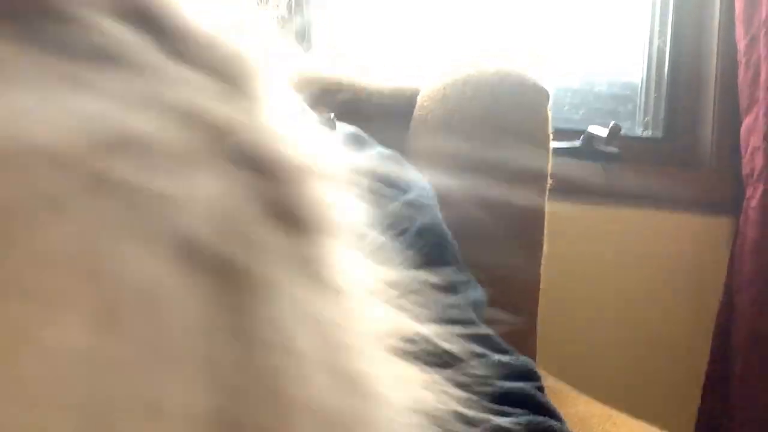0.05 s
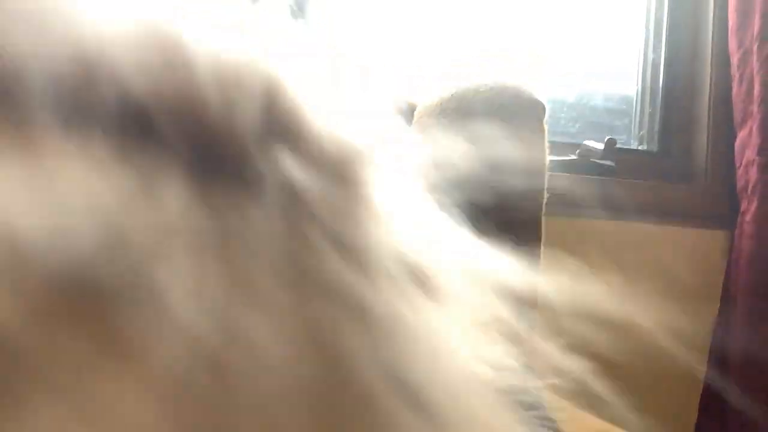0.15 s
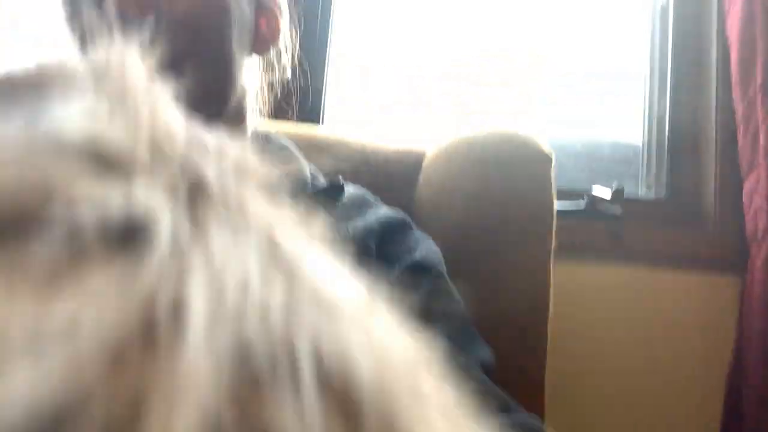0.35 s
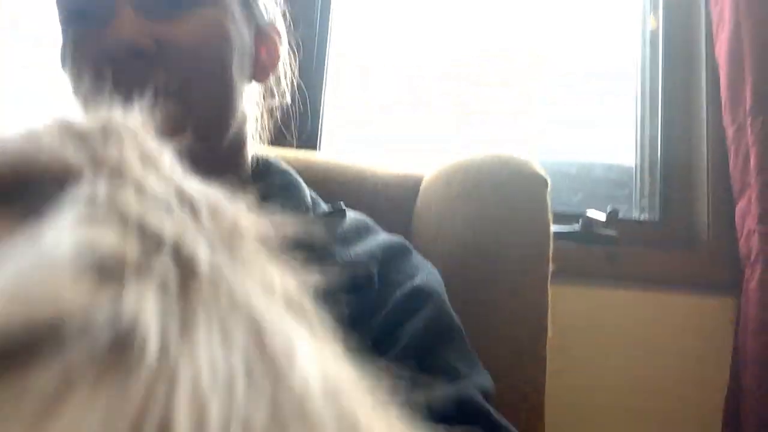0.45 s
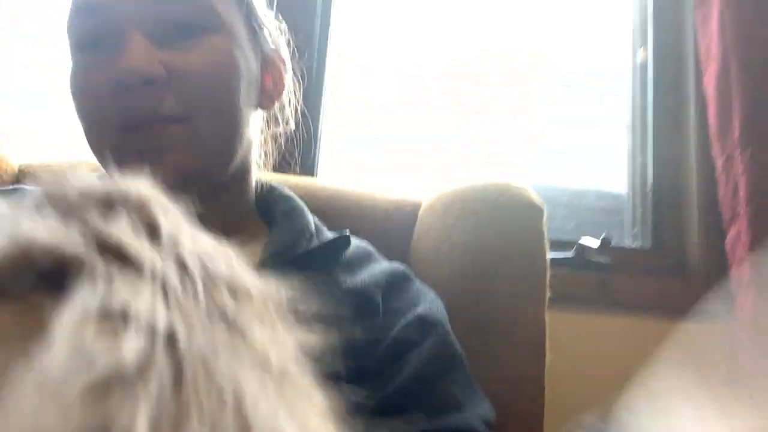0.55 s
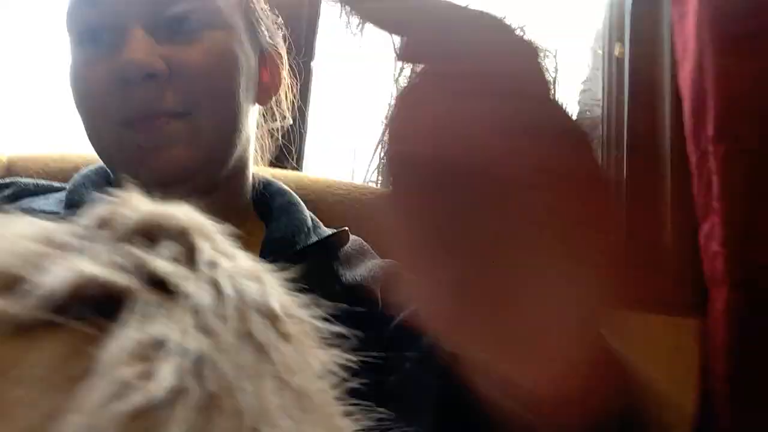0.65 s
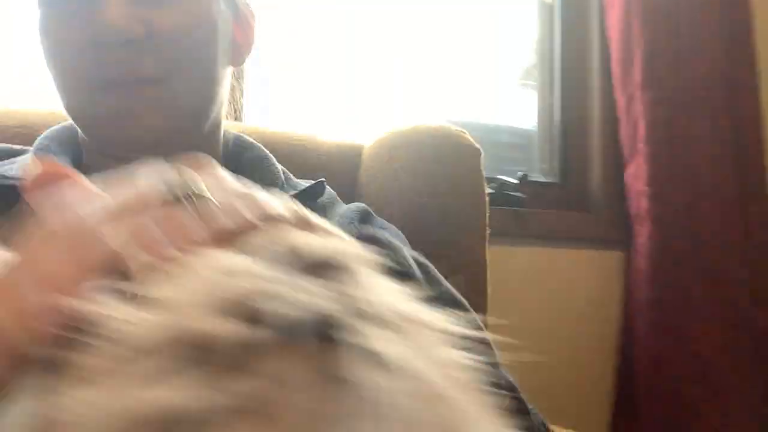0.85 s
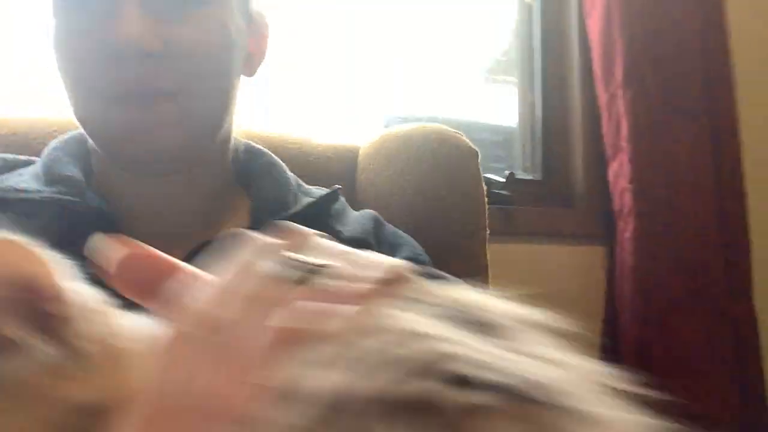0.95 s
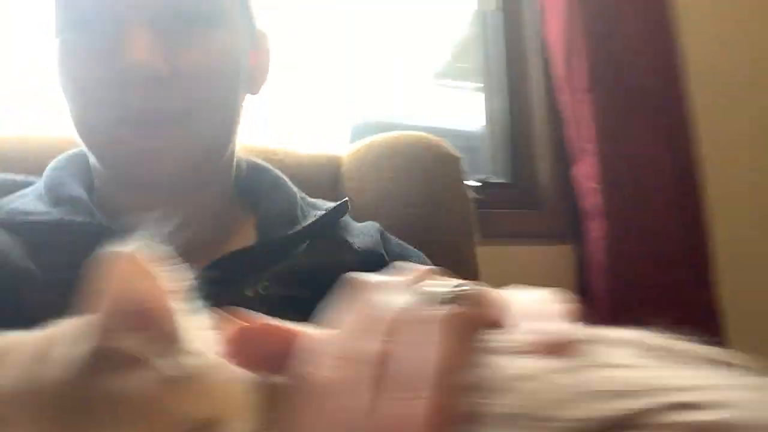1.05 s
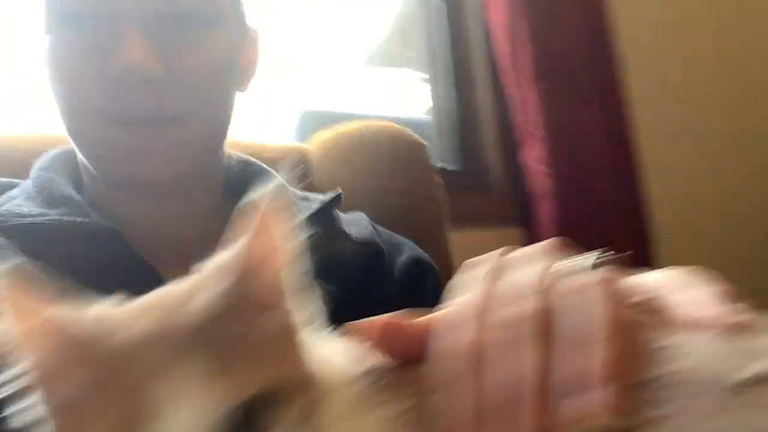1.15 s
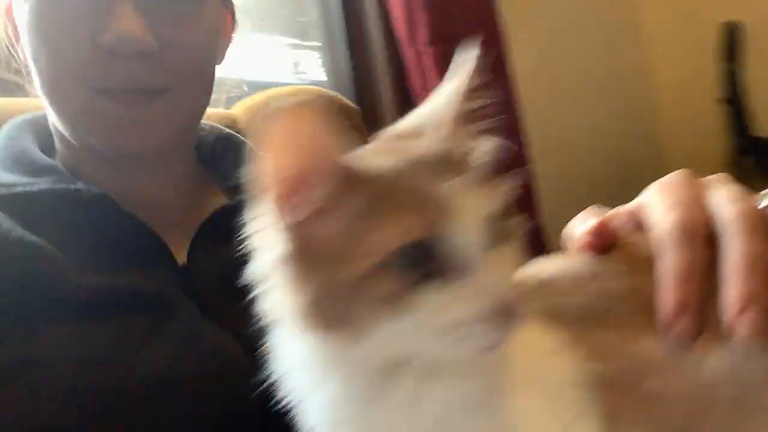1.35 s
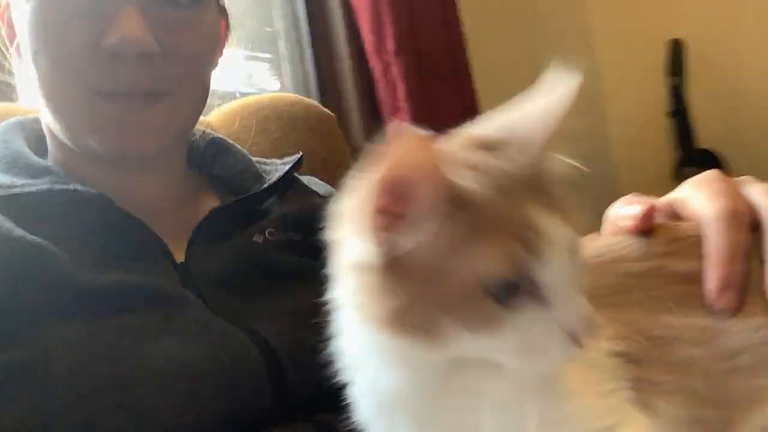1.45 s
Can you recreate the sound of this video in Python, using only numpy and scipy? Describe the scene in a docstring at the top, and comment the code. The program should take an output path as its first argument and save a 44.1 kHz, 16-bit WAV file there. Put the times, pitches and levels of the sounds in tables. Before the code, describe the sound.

A kitten purrs softly up close while its fur rustles against the microphone.

```python
"""A quiet room: a kitten purrs softly right at the microphone while a hand strokes it.
Its larynx opens and closes about 25 times a second; each pulse pops in the throat and rings the chest.
Fur slides over the microphone with a hiss and a coarser, resonant rub, and the casing takes
one small knock with a low thud, then a fainter tick. The purr goes on with a few light pats.
A faint thin whistle sits above it throughout."""
import sys
import numpy as np
from scipy import signal
from scipy.fft import rfft, irfft
from scipy.io import wavfile

SR = 44100
rng = np.random.default_rng(int(sys.argv[2]) if len(sys.argv) > 2 else 0)


def wrap_up_sound(samples):
    """Save the sound to the file named by the first command line argument, as 16-bit audio."""
    columns = np.atleast_2d(samples).T
    # keep every value between -1 and 1, then stretch to whole-number steps
    tamed = np.clip(columns, -1, 1)
    steps = np.round(tamed * 32767).astype(np.int16)
    wavfile.write(sys.argv[1], SR, steps)


N = 66150
T = np.arange(N) / SR

# Purr effort: time_s, pop_db, chest_db, opening_lead_s, opening_vs_closing_db
PURR_EFFORT = [(0, -64, -46, 0.011, -6.5), (.18, -52.5, -50, 0.011, -3.5), (.35, -80, -48, 0.015, -7.5),
               (.65, -47.5, -48, 0.0128, -4.5), (.82, -62, -56.5, 0.0099, -4), (.93, -56, -51, 0.011, -3.5),
               (1.06, -53, -49.5, 0.011, -4.5), (1.128, -53, -49.5, 0.01036, -5),
               (1.165, -68, -49.5, 0.011, 3), (1.2, -52, -53.5, 0.0127, -4), (1.25, -48, -47, 0.013, -1.5),
               (1.29, -53.5, -50.5, 0.011, 1), (1.36, -56, -51, 0.013, 4), (1.5, -57, -53.5, 0.012, 0)]
# Larynx cycles: time_s, rate_hz
PURR_RATE = [(0, 25.3), (.18, 25.95), (.3, 24.3), (.6, 24.97), (.82, 25.5), (1.02, 25.95), (1.15, 26.1),
             (1.18, 24), (1.25, 24.15), (1.32, 24.7), (1.4, 24.5), (1.5, 25.5)]
# Hairs sliding over the microphone: time_s, level_db
HISS_LEVEL = [(0, -67), (.06, -64.5), (.13, -60.5), (.197, -68), (.212, -48.5), (.245, -50.5), (.268, -60),
              (.295, -67), (.316, -48), (.365, -53), (.44, -50), (.46, -56), (.51, -50.5), (.56, -49.5),
              (.635, -50), (.7, -54), (.755, -55), (.79, -66.5), (.84, -78.5), (.9, -78.5)]
# Hiss colour: freq_hz, density_db
HISS_SPECTRUM = [(300, -5), (900, -3), (1300, -16), (1900, -7), (2450, -6), (3100, -5), (4500, -4.5),
                 (5600, -2.5), (6700, 3.5), (7500, -1), (8500, -7.5), (10500, -20.5), (13000, -33),
                 (16000, -37.5)]
# Coat dragging on the casing: time_s, level_db
RUB_LEVEL = [(0, -69.5), (.195, -71.5), (.212, -46), (.235, -42.5), (.26, -45), (.28, -50.5), (.305, -51),
             (.325, -44.5), (.345, -44.5), (.372, -39.5), (.382, -43.5), (.428, -50.5), (.443, -46),
             (.462, -51.5), (.482, -53), (.505, -52.5), (.55, -61), (.63, -64.5), (.68, -60), (.755, -57.5),
             (.79, -66), (.85, -100)]
# Rub colour: freq_hz, density_db
RUB_SPECTRUM = [(40, -32), (80, -4.5), (200, -1), (400, -6), (650, -3.5), (950, -5), (1300, -5),
                (1850, -14), (2450, -11.5), (3300, -19), (6000, -25), (11000, -34.5), (15000, -62.5)]
# Hair tips flicking the port: centre_s, width_s, level_db
FLICKS = [(.41, 0.022, -61), (.68, 0.043, -70.5)]
# Flick colour: freq_hz, density_db
FLICK_SPECTRUM = [(5000, -30), (9000, 5), (11500, 5), (13500, -8), (15000, -8), (16000, -14)]
# Hand passing lightly over the back: centre_s, width_s, level_db
PATS = [(1.005, 0.01, -65.5), (1.03, .012, -77), (1.118, 0.014, -77)]
# Pat colour: freq_hz, density_db
PAT_SPECTRUM = [(300, -9), (700, 6.5), (1250, -5.5), (2000, -14), (2700, -16), (4000, -23), (9000, -33)]
# Thin whistle: time_s, pitch_hz, level_db
WHISTLE = [(0, 7540, -72.5), (.81, 7720, -77), (.9, 7550, -79), (.96, 7400, -79), (1.02, 7610, -74.5),
           (1.07, 7500, -86), (1.12, 7440, -78), (1.3, 7390, -76), (1.5, 7350, -76)]
# Room hush: freq_hz, density_db
ROOM_SPECTRUM = [(25, -46), (42, -22.5), (65, 5), (110, 0), (200, -2), (400, -11.5), (700, -21),
                 (1000, -26.5), (3000, -36), (6200, -44), (6900, -36.5), (7500, -26.5), (8600, -32.5),
                 (15500, -36.5)]
# Rub resonances, the knock's low thud, soft bumps: start_s, level_db, pitch_hz, t60_s
LOW_RINGS = [(.226, -42.5, 135, 0.029), (.224, -43.5, 561, 0.051), (.238, -29.5, 485, 0.029),
             (.255, -41, 289, 0.17), (.2905, -37.5, 326, 0.059), (0.293, -25.5, 106, 0.035),
             (0.3132, -24.5, 145.5, 0.044), (0.317, -31, 66.6, 0.14), (0.369, -40.5, 207, 0.03),
             (.441, -27.5, 653, 0.019), (.437, -38, 137, 0.032), (.45, -35.5, 214, 0.042),
             (0.696, -52.5, 79, 0.19)]
# Ticks on the casing: start_s, level_db
KNOCKS = [(0.3097, -2), (0.3706, -14)]
# Casing modes: pitch_hz, gain_db, t60_s
CASING_MODES = [(7220, -12.5, 0.0024), (5500, -20.5, 0.0023), (3440, -19, 0.0039), (2460, -20.5, 0.0098),
                (1800, -29.5, 0.013), (1270, -20, .012)]

POP_HZ, POP_WIDTH_S, POP_SAG_HZ_PER_S = 568, .0011, 14000
CHEST_HZ, CHEST_RISE_S, CHEST_DECAY_S, CHEST_LEAD_S = 208.8, .0025, .0055, .00097
HISS_GRAINS_PER_S, RUB_GRAINS_PER_S = 14000, 3500


def from_db(db):
    """Decibels to gain."""
    return 10 ** (np.asarray(db) / 20)


def unit_rms(x):
    """Scale to rms 1."""
    return x / np.sqrt(np.mean(x ** 2) + 1e-20)


def curves(rows):
    """Each column after time_s, interpolated to every sample."""
    time_s, *columns = np.transpose(rows)
    return [np.interp(T, time_s, column) for column in columns]


def drift(corner_hz):
    """Slow random wander, rms 1."""
    pole = np.exp(-2 * np.pi * corner_hz / SR)
    return unit_rms(signal.lfilter([1], [1, -2 * pole, pole * pole], rng.standard_normal(2 * N))[N:])


def coloured(x, spectrum):
    """Shape x by a spectrum; rms 1."""
    freq_hz, density_db = np.transpose(spectrum)
    bins_hz = np.maximum(np.arange(N // 2 + 1) * SR / N, 1)
    bass_rolloff = np.minimum(bins_hz / freq_hz[0], 1) ** 2
    gain = from_db(np.interp(np.log(bins_hz), np.log(freq_hz), density_db))
    return unit_rms(irfft(rfft(x) * bass_rolloff * gain, N))


def swells(rows):
    """Bell-shaped rises in gain."""
    return sum(from_db(db) * np.exp(-.5 * ((T - centre_s) / width_s) ** 2)
               for centre_s, width_s, db in rows)


def ring(start_s, pitch_hz, t60_s, rise_s):
    """Damped sine with a soft onset."""
    age_s = np.maximum(T - start_s, 0)
    envelope = (1 - np.exp(-age_s / rise_s)) * np.exp(-np.log(1000) * age_s / t60_s)
    return envelope * np.sin(2 * np.pi * pitch_hz * age_s)


def purr_cycles(first_pulse_s=.0204):
    """Running count of larynx cycles; a closure at each whole number."""
    rate_hz, = curves(PURR_RATE)
    return np.cumsum(rate_hz) / SR - first_pulse_s * rate_hz[0]


def purr_pulse(centre_s, pitch_ratio, pop_db, chest_db):
    """Short throat pop, sinking in pitch, plus the lower ring of the chest."""
    offset_s = T - centre_s
    pop_cycles = pitch_ratio * (POP_HZ - .5 * POP_SAG_HZ_PER_S * offset_s) * offset_s
    pop = np.exp(-.5 * (offset_s / POP_WIDTH_S) ** 2) * np.sin(2 * np.pi * pop_cycles)
    age_s = np.maximum(offset_s + CHEST_LEAD_S, 0)
    envelope = (1 - np.exp(-(age_s / CHEST_RISE_S) ** 2)) * np.exp(-age_s / CHEST_DECAY_S)
    chest = envelope * np.sin(2 * np.pi * pitch_ratio * CHEST_HZ * age_s)
    return from_db(pop_db) * pop + 2 * from_db(chest_db) * chest


def purr(scatter_db=.8, pitch_scatter=.04):
    """The larynx gives one pulse on opening and one on closing, each slightly uneven."""
    pop_db, chest_db, lead_s, opening_db = curves(PURR_EFFORT)
    closures = np.flatnonzero(np.diff(np.floor(purr_cycles())))
    pulses = np.zeros(N)
    for i in closures:
        for centre_s, gain_db in (T[i], 0), (T[i] - lead_s[i], opening_db[i]):
            gain = from_db(gain_db + scatter_db * rng.standard_normal())
            pitch_ratio = 1 + pitch_scatter * rng.standard_normal()
            pulses += gain * purr_pulse(centre_s, pitch_ratio, pop_db[i], chest_db[i])
    return pulses


def hair_slips(grains_per_s, spectrum, spread_db=2):
    """Single hairs slip at random moments, in uneven sizes; rms 1."""
    sizes = from_db(spread_db * np.minimum(rng.exponential(1, N), 4))
    signs = rng.choice([-1, 1], N)
    slipping = rng.random(N) < grains_per_s / SR
    return coloured(sizes * signs * slipping, spectrum)


def fur(hiss_flicker_db=.8, rub_flicker_db=2.5, flicker_hz=36.4):
    """Hiss of sliding hairs, coarser rub where the coat presses, light flicks and pats."""
    hiss_db = curves(HISS_LEVEL)[0] + hiss_flicker_db * drift(flicker_hz)
    hiss = from_db(hiss_db) * hair_slips(HISS_GRAINS_PER_S, HISS_SPECTRUM)
    rub_db = curves(RUB_LEVEL)[0] + rub_flicker_db * drift(flicker_hz)
    rub = from_db(rub_db) * hair_slips(RUB_GRAINS_PER_S, RUB_SPECTRUM)
    flicks = swells(FLICKS) * hair_slips(HISS_GRAINS_PER_S, FLICK_SPECTRUM)
    pats = swells(PATS) * hair_slips(RUB_GRAINS_PER_S, PAT_SPECTRUM)
    return hiss + rub + flicks + pats


def whistle(waver_hz=128, flicker_db=4, throb_depth=.32):
    """Faint high tone that wavers, and throbs with the purr."""
    pitch_hz, level_db = curves(WHISTLE)
    cycles = np.cumsum(pitch_hz + waver_hz * drift(corner_hz=120)) / SR
    throb = 1 - throb_depth * np.cos(2 * np.pi * purr_cycles())
    gain = from_db(level_db + flicker_db * drift(corner_hz=35))
    return gain * throb * np.sin(2 * np.pi * cycles)


def room(level_db=-65.5):
    """Steady low hush."""
    return from_db(level_db) * coloured(rng.standard_normal(N), ROOM_SPECTRUM)


def low_rings():
    """Short dull low rings: resonances of the rub, the knock's low thud, soft bumps."""
    return sum(from_db(level_db) * ring(start_s, pitch_hz, t60_s, rise_s=.0018)
               for start_s, level_db, pitch_hz, t60_s in LOW_RINGS)


def casing_knocks(snap_db=-13.5, snap_band_hz=(2600, 8300), top_hz=8300):
    """Hard contact snaps; each casing mode rings from one of its cycles later."""
    clicks, rings = np.zeros(N), np.zeros(N)
    for start_s, level_db in KNOCKS:
        clicks[int(start_s * SR)] = from_db(level_db + snap_db)
        for hz, gain_db, t60_s in CASING_MODES:
            rings += from_db(level_db + gain_db) * ring(start_s + 1 / hz, hz, t60_s, rise_s=.5 / hz)
    snap = signal.sosfilt(signal.butter(2, snap_band_hz, "band", fs=SR, output="sos"), clicks)
    return signal.sosfilt(signal.butter(3, top_hz, fs=SR, output="sos"), rings + snap)


def scene():
    """Kitten and hand over the room's hush, mono."""
    return (room() + purr() + fur() + whistle() + low_rings() + casing_knocks())[None]


def record(dry):
    """The small microphone loses the deepest bass; the top is cut."""
    low_cut_hz, high_cut_hz = 64.7, 15800
    thin = signal.sosfilt(signal.butter(4, low_cut_hz, "high", fs=SR, output="sos"), dry)
    return signal.sosfilt(signal.ellip(10, .1, 70, high_cut_hz, fs=SR, output="sos"), thin)


dry = scene()
out = record(dry)
wrap_up_sound(out)
```